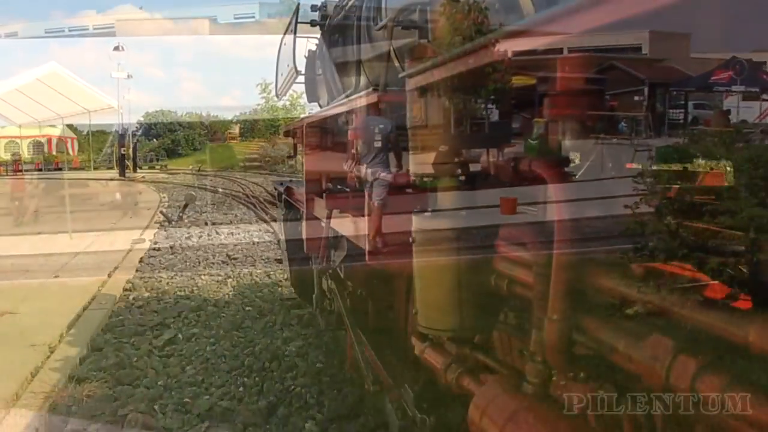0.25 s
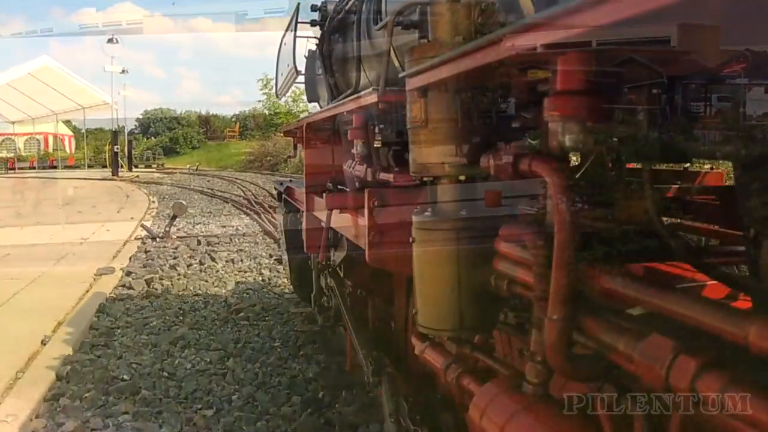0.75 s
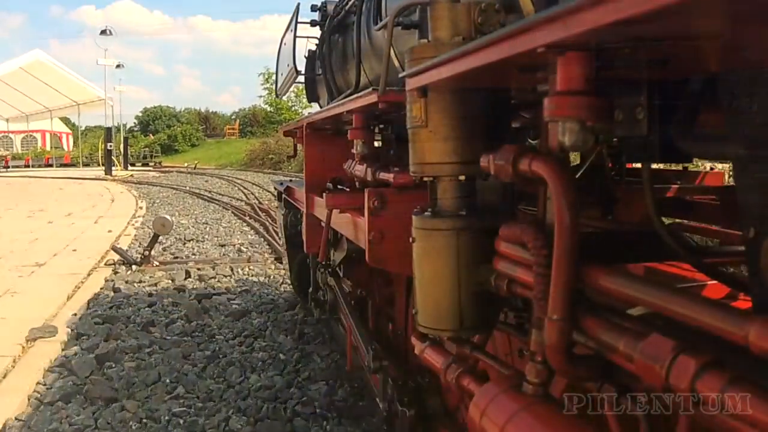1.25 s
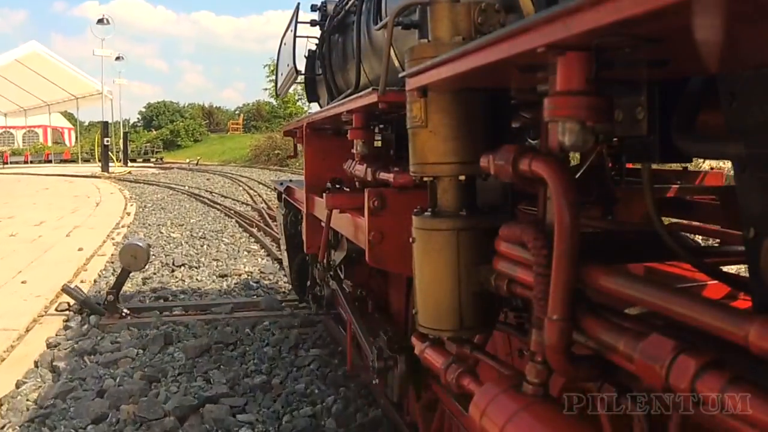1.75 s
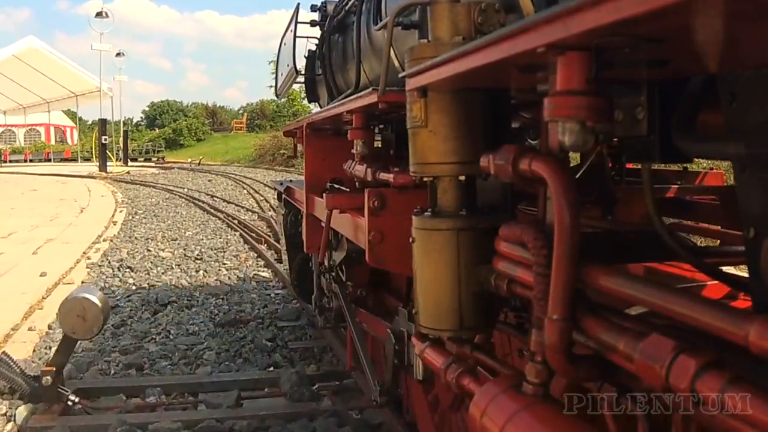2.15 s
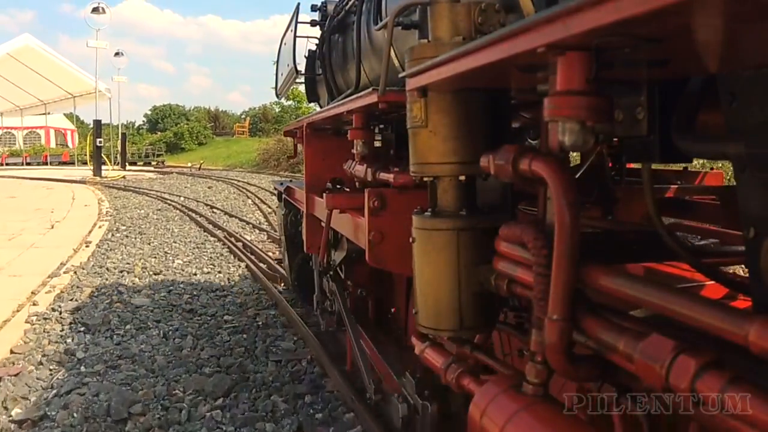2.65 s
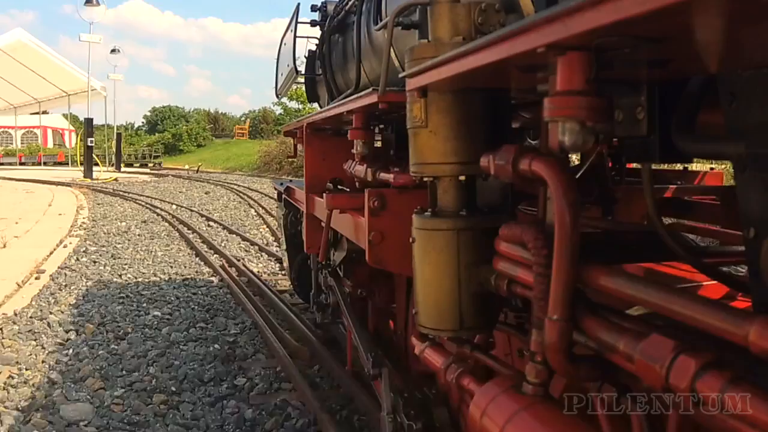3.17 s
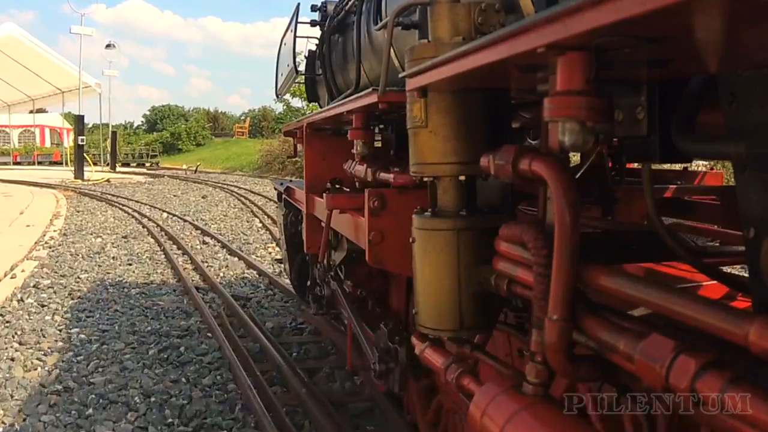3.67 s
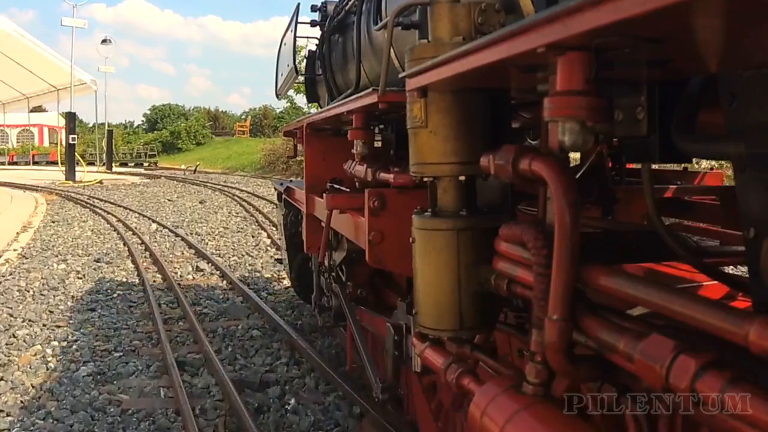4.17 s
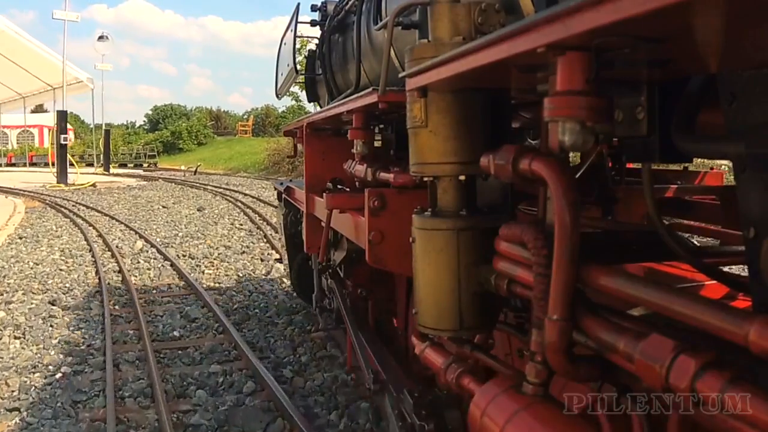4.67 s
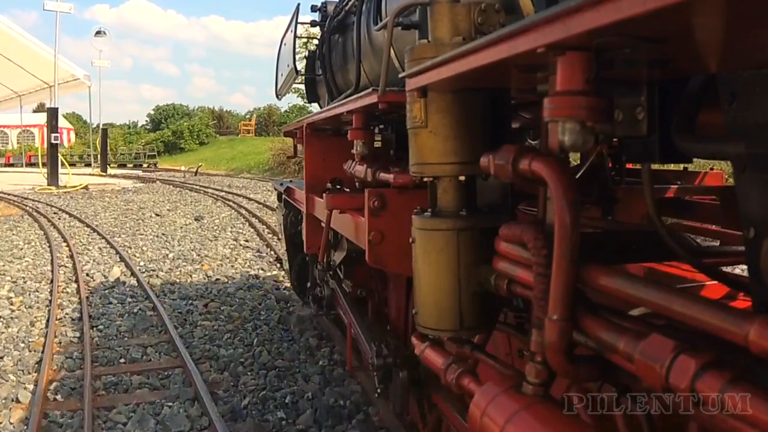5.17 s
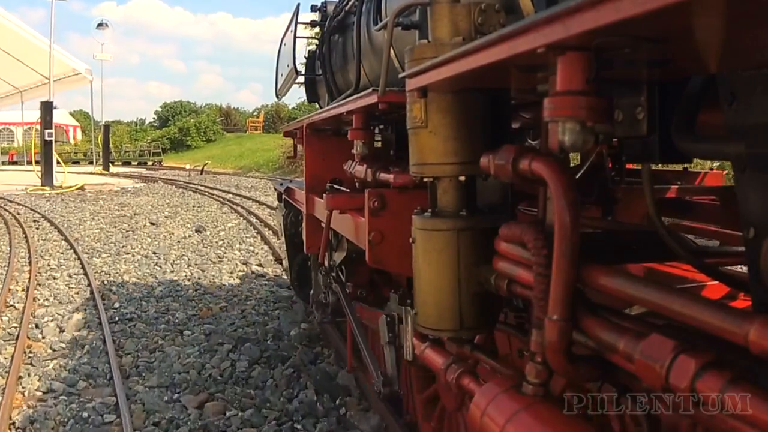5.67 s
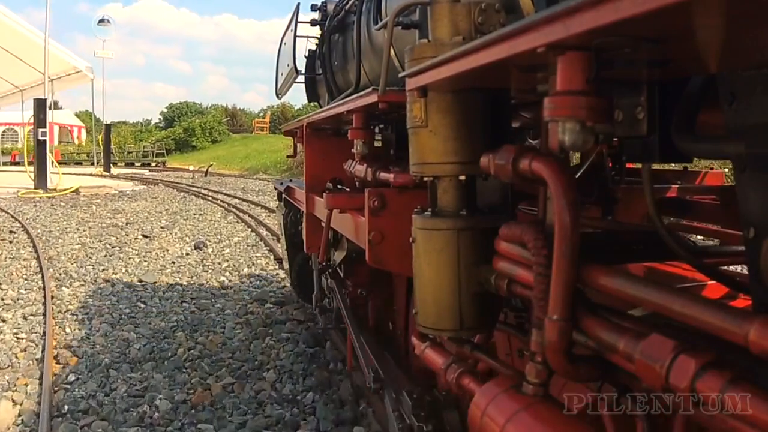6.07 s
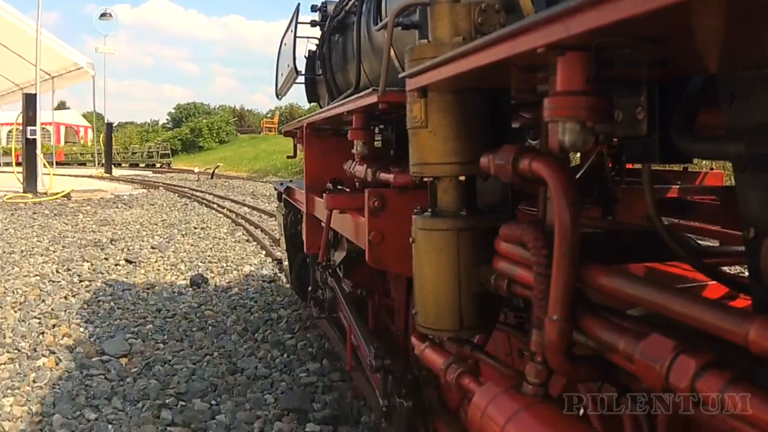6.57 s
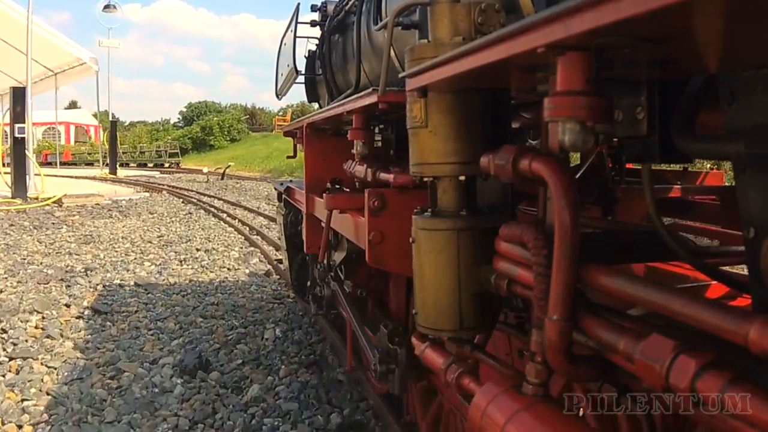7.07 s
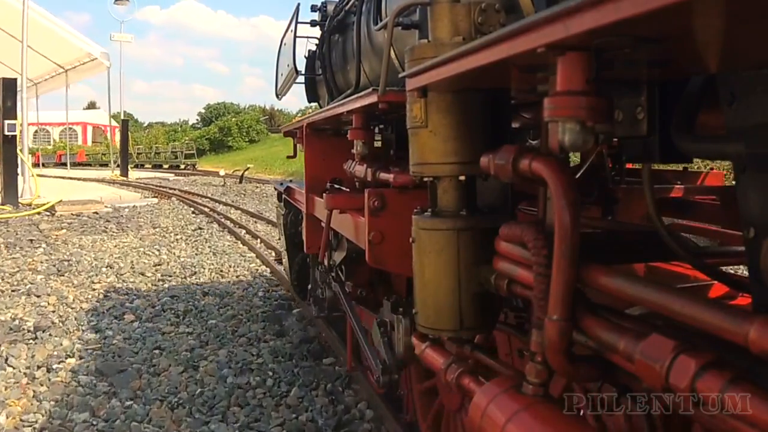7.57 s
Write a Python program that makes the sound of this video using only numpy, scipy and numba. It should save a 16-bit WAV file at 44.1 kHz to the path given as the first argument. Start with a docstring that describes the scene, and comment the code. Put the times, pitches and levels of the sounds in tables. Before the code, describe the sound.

Close, boxed-in rumble of a small steam locomotive's running gear, with irregular metallic knocks, one hard overloaded clank midway, and faint hiss.

```python
"""Riding on a small steam locomotive

A camera in a closed housing rides beside the rods and wheels: noise and blows drive banks of resonances.
Rolling, rough swells and knocks at rail joints and points ring frame and housing; shaped noise makes ticks and
steam hiss; short sines make pings, a chirp and high blips; one steady sine makes a thin whine. A broad airy
rush with low rumble, made of shaped noise, sinks over the first two seconds and stays faint."""
import sys
import numpy as np
from scipy import signal
from scipy.fft import rfft, irfft, next_fast_len
from scipy.io import wavfile
from scipy.ndimage import uniform_filter1d
from numba import njit

SR = 44100
rng = np.random.default_rng(int(sys.argv[2]) if len(sys.argv) > 2 else 0)


def generate_wav(sig):
    """Save sig (samples, or channels by samples) to the path in sys.argv[1] as 16-bit PCM at SR."""
    pcm = np.round(np.clip(np.atleast_2d(sig).T, -1, 1) * 32767).astype(np.int16)
    wavfile.write(sys.argv[1], SR, pcm)


N = 345303


def running_gear():
    """Rolling and knocks ring the body; the housing wall stops its treble, fittings rattle above it."""
    # rolling before each part's gain: (time [s], body level [dB], rods and fittings [dB], chassis hum [dB])
    rolling = [(0, -26, -47, -49), (.4, -24.5, -42.5, -50), (.8, -24.5, -42.5, -41), (1.5, -22.5, -46, -44),
               (2.2, -22.5, -44, -44), (2.95, -26, -44, -41.5), (3.4, -24, -45.5, -33),
               (3.7, -22, -46.5, -46.5), (4.2, -23.5, -48.5, -42.5), (5.0, -24.5, -47, -40),
               (5.4, -27, -47, -45), (6.1, -26, -46, -45), (6.7, -24.5, -46, -42),
               (7.15, -24, -44.5, -43.5), (7.45, -24.5, -47, -52.5), (7.83, -23, -42.5, -41)]
    # frame and housing modes: (pitch [Hz], width [Hz], relative level [dB], left minus right [dB])
    body_modes = [(82.4, 17, -2.5, 6.5), (183, 22, -7.5, 5), (223.2, 33.5, 0, 5), (327.3, 37.46, 1.47, 3),
                  (447, 35, -6, 7.5), (532, 56.4, -1, 4.5), (623.8, 45.5, 0.9, 7.5), (799, 58.4, -1, 4.5),
                  (976, 45.5, -7, 6.5), (1210.5, 62, -8, 9), (1266, 49.75, -8.5, 10.5),
                  (1474, 36.8, -10, 3.5), (1510, 40.7, -9, 0)]
    # rods and small fittings: (pitch [Hz], width [Hz], relative level [dB], left minus right [dB])
    fitting_modes = [(1700, 125, -9, 0), (1856, 101, -4.5, 13), (1963, 136, -12, -23),
                     (2270, 216, 2.5, -8.5), (2473, 440, -0.5, 10), (2657, 225, 2, 0),
                     (3020, 108, -7.5, 19), (3570, 437, -1.5, 5.5), (3900, 244, -5.5, 14.5),
                     (4184, 180, -12.5, -14.5), (4700, 120, -22, 2), (5050, 1000, -13, 8),
                     (6340, 1100, -17, 2)]
    wall_hz, low_cut_hz = 1584, 77
    right_lag_s, fittings_lag_s, tick_lag_s = 7e-5, 0.00035, 0.0003
    rod_share, rod_loss_db = 0.39, -10  # rods lie between plate and small fittings
    hum_drive_db = 19  # the low mode is narrow and takes a stronger push
    upper_plate_db = 6  # knocks ring the higher plate modes harder
    mode_drift, drift_per_s = 0.3, 8  # drift in mode widths

    roll, rattle, hum = undb(curves(rolling))
    hum = hum * undb(hum_drive_db + 0.81 * walk(4.03))
    s, shell_db, frame_db, plate_db, small_db, t60 = knocks()
    rod_db = rod_share * plate_db + (1 - rod_share) * small_db + rod_loss_db

    # each part has its own play, and each knock reaches the parts in its own proportions
    # every force is a pair: steady push, blows
    thump = jolts(s, frame_db, 2.07 * t60, rise=0.0029)
    chassis = hum, undb(-3) * thump
    frame = roll * chatter(rate=16, spread_db=-10.0, t60=0.36), thump

    shell_push = roll * chatter(rate=60, spread_db=0.5, t60=0.046) + rough_swells(column=4)
    shell = shell_push, jolts(s, shell_db, t60, rise=0.00053)

    plate_push = roll * chatter(rate=45, spread_db=16.5, t60=0.049) + rough_swells(column=2)
    plate = plate_push, jolts(s, plate_db, t60, rise=0.0032)
    upper_plate = plate[0] + rough_swells(column=2), undb(upper_plate_db) * plate[1]

    rod_push = rattle * chatter(rate=43, spread_db=15.0, t60=0.029) + rough_swells(column=3)
    rods = rod_push, jolts(s, rod_db, 1.64 * t60, rise=0.0016)
    low_rods = rods[0] + undb(22.5) * rough_swells(column=3), undb(13.0) * rods[1]

    small_push = rattle * chatter(rate=43, spread_db=10.0, t60=0.034)
    small = small_push, jolts(s, small_db, 1.58 * t60, rise=0.0016)

    def body_force(hz):
        """Chassis, frame, shell and plate drive the body modes from low to high."""
        if hz < 120:
            return chassis
        if hz < 400:
            return frame
        if hz < 1100:
            return shell
        return plate if hz < 1400 else upper_plate

    def fitting_force(hz):
        """Rods, then small fittings share the treble from low to high."""
        if hz < 2110:
            return low_rods
        return rods if hz < 2850 else small

    def drifting_ring(x, hz, width):
        """Body modes waver as the load on the frame shifts."""
        return waver(x, hz + mode_drift * width * walk(drift_per_s), width)

    def double_ring(x, hz, width):
        """Two equal resonances in a row give steeper skirts."""
        return ring(ring(x, hz, width), hz, width)

    body = modes(body_modes, body_force, flicker_db=1.24, alike_hz=14000, snap=9.4, together=0.71,
                 resonate=drifting_ring)
    body = signal.sosfilt(signal.butter(6, wall_hz, fs=SR, output="sos"), body)
    body = signal.sosfilt(signal.butter(2, low_cut_hz, "high", fs=SR, output="sos"), body)
    fittings = modes(fitting_modes, fitting_force, flicker_db=2.0, alike_hz=9000, snap=4.2, together=0.43,
                     resonate=double_ring)
    enclosed = housing(late(body, right_lag_s) + late(fittings, fittings_lag_s))
    return enclosed + ticks(s + tick_lag_s, small_db)


def knocks():
    """The clear knocks and faint ones at chance moments, by column."""
    # blows before each part's scaling:
    # (time [s], shell [dB], frame [dB], plate [dB], small fittings [dB], base t60 of the jolt [s])
    clear_knocks = [(0.051, -40, -42, -38, -48, 0.025), (0.127, -14, -22, -7, -30.5, 0.026),
                    (0.147, -17, -26, -10.5, -35, 0.022), (0.272, -42.5, -46, -8, -38, 0.012),
                    (0.411, -15, -41, -7, -29, 0.019), (0.434, -32, -44, -12.5, -27.5, 0.04),
                    (0.636, -27, -42, -30, -36, 0.053), (0.676, -33, -41, -11.5, -32, 0.042),
                    (0.77, -46, -52, -19, -35, 0.02), (0.825, -21, -49, -32, -38, 0.02387),
                    (0.87, -39, -52, -13, -36.5, 0.063), (0.991, -22, -55, -19, -49, 0.2),
                    (1.119, -18, -39, -15, -54, 0.03), (1.136, -17, -25, -18, -39.5, 0.12),
                    (1.201, -14, -43.5, -11, -42, 0.029), (1.241, -18, -40, -17, -58, 0.025),
                    (1.279, -32, -36, -17, -55, .02), (1.401, -9.5, -32, -25, -39, 0.016),
                    (1.436, -26, -27, -19, -39.5, 0.17), (1.536, -18, -35, -20, -58, 0.013),
                    (1.657, -30, -39, -12, -48, 0.016), (1.713, -16, -26, -19, -47, 0.015),
                    (1.757, -8, -30, -24, -53, 0.021), (1.766, -28, -34, -15.5, -42, 0.072),
                    (1.994, -39, -26, -21, -38, 0.01), (2.035, -32, -18.5, -8.5, -44, 0.056),
                    (2.23, -17, -45, -23, -69, 0.032), (2.31, -13, -26, -19, -54, 0.023),
                    (2.349, -19.5, -44, -16.5, -43, 0.14), (2.378, -25, -31, -16, -54, 0.11),
                    (2.49, -27, -44, -18, -52.5, 0.016), (2.687, -18.5, -22, -14, -42, 0.26),
                    (2.743, -17, -34, -28, -38, 0.027), (2.953, -24, -31, -19.5, -57, 0.17),
                    (2.974, -16.5, -25, -23, -35.5, 0.14), (3.036, -16, -46, -18, -44, 0.08),
                    (3.193, -18, -32, -14, -40.5, 0.096), (3.222, -16, -42, -4, -31, 0.037),
                    (3.244, -20, -22, -15, -40, .04), (3.279, -12.5, -25, -2, -28, 0.031),
                    (3.308, -18, -44, -10, -41, 0.02078), (3.442, -13.5, -32, -22, -39, 0.015),
                    (3.521, -5, -3.5, -19, -36, 0.026), (3.524, -1.5, -4, -1, -20, 0.041),
                    (3.533, -2, -3, 3.5, -11.5, 0.017), (3.556, -7, -35, -4, -36, 0.017),
                    (3.584, -11.5, -20, -4.5, -36, 0.029), (3.61, -37.5, -23, -9, -37, 0.019),
                    (3.645, -16, -40, -9, -55, 0.015), (3.768, -12.5, -19, -18, -60, 0.02),
                    (3.812, -10.5, -16, -5, -35, 0.029), (3.861, -15, -9, -7.5, -24, 0.029),
                    (3.892, -17, -40, -18, -46, 0.078), (3.927, -6.5, -43, -1, -42, 0.018),
                    (4.103, -16, -25, -37, -60.5, 0.021), (4.15, -24, -18, -36, -54, 0.21),
                    (4.196, -21, -23, -14, -37.5, 0.058), (4.262, -31, -8.5, -14, -40, 0.019),
                    (4.402, -23, -54, -19.5, -41, 0.11), (4.447, -27, -28, -18, -45, 0.072),
                    (4.571, -26, -22, -20, -61, 0.12), (4.666, -22, -30, -19, -51, 0.018),
                    (4.76, -26, -42, -17, -55, 0.09), (4.799, -48, -42, -24, -41, 0.03),
                    (4.905, -20, -40, -41, -63, 0.054), (4.923, -21, -32, -13.5, -57, 0.034),
                    (5.061, -13, -22, -15, -42, 0.025), (5.093, -23, -26, -19, -59, 0.055),
                    (5.25, -26, -22, -17.5, -58, 0.046), (5.284, -17, -11.5, -42, -63.5, 0.025),
                    (5.395, -24, -32, -18, -60, 0.015), (5.44, -37, -35, -14, -46, 0.024),
                    (5.457, -42, -43, -9, -40, 0.027), (5.48, -13, -26, -29, -58, 0.015),
                    (5.674, -13, -36, -10.5, -43, 0.02), (5.805, -18, -33, -11.5, -49, 0.05303),
                    (5.878, -43, -43, -7.5, -54, 0.0085), (6.155, -25, -20.5, -36, -73, 0.17),
                    (6.322, -14, -24, -25, -55.5, 0.03), (6.47, -10, -20, -21, -42, 0.022),
                    (6.501, -14.5, -37, -13, -45, 0.019), (6.71, -30, -19, -8.5, -52, 0.046),
                    (6.752, -35, -22, -22, -60, 0.069), (6.824, -19, -29, -7, -42, 0.022),
                    (7.114, -34, -44.5, -6, -40, 0.024), (7.208, -24, -19, -33, -63, 0.07),
                    (7.371, -17, -25, -25, -62, 0.021), (7.402, -18.5, -34.5, -21, -48, 0.054),
                    (7.444, -15, -18, -30, -47, 0.091), (7.496, -17, -37, -40, -44, 0.034),
                    (7.545, -15.5, -31, -32, -53, 0.023), (7.666, -18, -29, -14, -45, 0.069),
                    (7.696, -28, -28, -20, -46, 0.018), (7.74, -20, -19, -20, -52, 0.03)]
    faint_per_s, spread_db = 4, 5  # each level strays up to the spread either way
    centre_db, t60 = np.array([-26, -30, -24, -51]), 0.05  # shell, frame, plate, small fittings
    faint = []
    for moment, *luck in rng.random((int(faint_per_s * N / SR), 5)):
        levels = centre_db + 2 * spread_db * (np.array(luck) - 0.5)
        faint.append((moment * N / SR, *levels, t60))
    return np.transpose([*clear_knocks, *faint])


def jolts(times, db, t60, rise):
    """Force envelope of blows: a rounded rise, then exponential fall."""
    env, t = np.zeros(N + SR), np.arange(SR // 8) / SR
    blows = np.broadcast(times, undb(db), np.maximum(t60, 0.005), np.maximum(rise, 2e-4))
    for s, gain, fall, up in blows:
        i = int(s * SR)
        attack = np.sin(np.pi / 2 * np.minimum(t / up, 1))
        decay = np.exp(-np.log(1000) * np.maximum(t - up, 0) / fall)
        env[i:i + len(t)] += gain * attack * decay
    return env[:N]


def chatter(rate, spread_db, t60):
    """Loose play in the motion: many small random jolts over a steady push, rms 1."""
    moment, strength = rng.random((int(rate * N / SR), 2)).T
    env = 1 + jolts(moment * N / SR, -8.0 + spread_db * strength, t60, 0.0016)
    return env / np.sqrt(np.mean(env ** 2))


def rough_swells(column):
    """Force of rough swells of body, plate and rods, broken into quick slips."""
    # before each part's gain: (time [s], length [s], plate level [dB], rods level [dB], shell level [dB])
    swell_rows = [(0.61, 0.12, -35, -58, -24.5), (1.337, 0.068, -46, -65, -34), (1.487, .08, -42, -63, -30),
                  (2.593, 0.1, -24, -46, -34), (5.408, 0.057, -26, -55, -45), (6.442, 0.03, -22, -45, -34),
                  (6.716, 0.11, -19.5, -45, -37), (7.294, .1, -50, -69, -32), (7.69, 0.092, -38, -65, -30)]
    t, env = np.arange(N) / SR, 0
    for row in swell_rows:
        swell = np.sin(np.pi * np.clip((t - row[0]) / row[1], 0, 1))
        env = env + undb(row[column]) * swell
    return env * undb(3 * walk(70))


def modes(table, force, flicker_db, alike_hz, snap, together, resonate):
    """Every mode takes its share of the force, partly the same shaking for all, which darkens the gaps."""
    # push of a blow at a mode's pitch, its phase wander in mode widths, its noise share
    shake_db, wander, blow_grit = 10.5, 5.98, 0.68
    total = np.sqrt(sum(w * undb(db) ** 2 for _, w, db, _ in table) * np.pi / SR)
    out, common = 0, rng.standard_normal((2, N))
    for k, (hz, width, db, side_db) in enumerate(table):
        steady, blows = force(hz)
        a, b = together * common + np.sqrt(1 - together ** 2) * rng.standard_normal((2, N))
        alike = np.exp(-hz / alike_hz)  # high modes differ more between the microphones

        def both(v):
            """Left as given, right partly replaced by separate noise."""
            return np.array([v, alike * v + np.sqrt(1 - alike ** 2) * b])

        # a blow shakes each mode at its own pitch, firmly but with a wandering phase
        phase_step = 2 * np.pi * hz / SR + np.sqrt(wander * width / SR) * rng.standard_normal(N)
        shake = undb(shake_db) * np.sqrt(width / SR) * np.cos(np.cumsum(phase_step))
        rough = steady * undb(flicker_db * walk(9)) * both(a) + blows * both(shake + blow_grit * a)
        # soon after its onset a blow gives one sharp push, the same for both microphones
        rising = 1.0 * (np.diff(blows, prepend=0) > 0)
        contact = np.roll(np.diff(rising, prepend=0) > 0, 40)  # 40 samples on
        push = rough + snap * (-1) ** k * contact * blows
        out = out + undb(db) * pan(side_db) * resonate(push, hz, width)
    return out / total


@njit
def waver(x, hz, width):
    """Band-pass whose centre moves every sample, gain 1 at the centre."""
    y = np.empty_like(x)
    for c in range(x.shape[0]):
        band, low = 0., 0.
        for i in range(x.shape[1]):
            g, k = np.tan(np.pi * hz[i] / SR), width / hz[i]
            v = (band + g * (x[c, i] - low)) / (1 + g * (g + k))
            band = 2 * v - band
            low += 2 * g * v
            y[c, i] = k * v
    return y


def housing(x):
    """The closed housing cancels the sound in narrow bands, one after another."""
    # (centre [Hz], width [Hz], share removed at the centre)
    dips = [(1158, 39, 0.25), (1375, 75, 0.42), (1640, 37, 0.34), (1807, 160, 0.46), (2055, 210, 0.65),
            (2620, 71, .4)]
    for hz, width, share in dips:
        x = x - share * ring(x, hz, width)
    return x


def late(x, s):
    """The right port hears it s seconds later."""
    return np.array([x[0], np.roll(x[1], round(s * SR))])


def ticks(s, db):
    """Pins and valve gear tick with every knock, reaching the microphones through the air as noise bursts."""
    # two noise spectra: (frequency [Hz], relative density [dB per Hz])
    tick_colour = [(2500, -29), (4500, 5.5), (6000, 0.5), (8000, -2), (11000, -28)]
    sizzle_colour = [(6500, -30), (8500, 7), (12000, -4), (14500, -18)]
    tick_db, sizzle_db = -16, -17.5  # against the small fittings
    rise_s, t60_s = 0.0028, 0.034
    tick = jolts(s, db + tick_db, t60_s, rise_s) * colour(pair(0.3), tick_colour)
    sizzle = jolts(s, db + sizzle_db, 0.77 * t60_s, rise_s) * colour(pair(0.17), sizzle_colour)
    return pan(13.0) * (tick + sizzle)


def pings():
    """Short damped pings, some alone, some together with a knock; one chirp slides down as it fades."""
    # single pings or short even runs: (first time [s], pings, level before damping and pan [dB], pitch [Hz])
    ping_runs = [(.413, 1, -19, 1500), (0.436, 1, -22, 1530), (3.28, 1, -7, 1492), (6.503, 1, -24, 1550),
                 (6.713, 1, -19, 1520), (7.115, 1, -23, 1510), (1.203, 1, -29, 1860), (4.925, 1, -36, 1890),
                 (5.254, 1, -31, 1880), (5.806, 1, -31, 1890), (6.457, 1, -37, 1950), (6.712, 1, -28, 1900),
                 (6.737, 1, -33, 2300), (6.754, 1, -28, 1900), (4.126, 1, -40, 2440),
                 (4.151, 1, -39.5, 2210), (4.301, 1, -37.5, 2300), (4.484, 1, -34, 2240),
                 (4.57, 1, -36, 2330), (4.645, 2, -42, 2330), (4.803, 4, -36, 2420), (5.256, 1, -35, 2260),
                 (5.535, 5, -39, 2420), (6.503, 1, -40, 2450), (6.712, 1, -36, 2600), (6.826, 1, -31, 2250),
                 (7.116, 1, -29, 2300)]
    gap_s = 0.0385
    out, t = np.zeros(N + SR), np.arange(SR // 10) / SR
    for first, repeats, db, hz in ping_runs:
        tone = np.sin(2 * np.pi * hz * t) * np.minimum(t / 0.001, 1) * np.exp(-t / 0.0076)
        for k in range(round(repeats)):
            i = int((first + k * gap_s) * SR)
            out[i:i + len(t)] += undb(db) * tone
    chirp_s, chirp_db, from_hz, to_hz, glide_s = 0.824, -43, 5900, 5650, 0.025
    cycles = np.cumsum(to_hz + (from_hz - to_hz) * np.exp(-3 * t / glide_s)) / SR
    fade = np.minimum(t / 0.0022, 1) * np.exp(-3.2 * t / glide_s)
    i = int(chirp_s * SR)
    out[i:i + len(t)] += undb(chirp_db) * np.sin(2 * np.pi * cycles) * fade
    return pan(4.7) * out[:N]


def high_blips():
    """Brief thin high tones near 14 kHz, each swelling to a peak and fading, roughened by noise."""
    # (peak time [s], level before roughness and pan [dB], pitch [Hz])
    blip_peaks = [(2.001, -51, 13900), (2.376, -47, 13800), (2.655, -55, 14100), (3.105, -33, 14880),
                  (3.215, -47, 14100), (3.915, -56, 14000), (4.287, -46, 13800), (4.364, -44, 13800),
                  (4.41, -45, 13600), (4.492, -56, 14000), (4.616, -56.5, 13800), (4.683, -56, 13900),
                  (4.749, -50.5, 14000)]
    rise_s, fall_s = 0.0048, 0.00639  # exponential time constants
    half = SR // 20
    out, t = np.zeros(N + SR), np.arange(-half, half) / SR
    swell = np.exp(np.where(t < 0, t / rise_s, -t / fall_s))
    for s, db, hz in blip_peaks:
        i = int(s * SR) - half
        out[i:i + len(t)] += undb(db) * np.sin(2 * np.pi * hz * t) * swell
    roughness = 1 + 2.0 * ring(rng.standard_normal(N), 250, 400)
    return pan(12.964) * out[:N] * roughness


def steam():
    """Leaking steam: broad hiss, fluttering in level."""
    # before flutter and pan: (time [s], level [dB])
    steam_level = [(0, -66), (.8, -59), (1.5, -61), (4.9, -61.5), (5.8, -57), (7.83, -56)]
    # (frequency [Hz], relative density [dB per Hz])
    hiss_colour = [(2650, -33), (4500, -15), (5090, 8), (5920, -2.5), (6400, 2), (7570, -0.5), (8530, 3),
                   (12500, -0.5), (13400, -36)]
    flutter = undb(walk(25))
    return undb(curves(steam_level)[0]) * flutter * pan(7.9) * colour(pair(0.043), hiss_colour)


def top_band():
    """A thin fluttering noise band near 12.5-14.3 kHz comes in at about 5 s."""
    # (frequency [Hz], relative density [dB per Hz])
    top_colour = [(12000, -40), (12500, -8), (12850, -4), (13300, -10), (13700, -4), (14100, 5), (14250, 2),
                  (14330, -35), (14600, -70)]
    start_s, rise_s, top_db = 4.9, 0.28, -69
    fade_in = np.clip((np.arange(N) / SR - start_s) / rise_s, 0, 1)
    flutter = undb(2 * walk(30))
    return undb(top_db) * fade_in * flutter * pan(22.0) * colour(pair(0.66), top_colour)


def whine():
    """One thin steady sine throughout."""
    whine_hz, whine_db = 11550, -75  # level before pan
    return pan(11) * undb(whine_db) * np.sin(2 * np.pi * whine_hz * np.arange(N) / SR)


def fading_rush():
    """A broad airy rush with low rumble: sinking noise, slightly unsteady, nearly mono."""
    # (time [s], level [dB])
    fade = [(0, -23), (.4, -29), (.83, -29.5), (.92, -35), (1.25, -42), (1.7, -49.5)]
    # (frequency [Hz], relative density [dB per Hz])
    rush_colour = [(12, -37), (20, 4), (55, 7), (79, 14.5), (130, 5), (208, 10), (331, -7), (380, 6.5),
                   (637, -0.5), (692, 2), (793, -10), (1410, -8), (1530, -6), (1900, -10), (2700, -16.5),
                   (13200, -36), (13900, -70)]
    level = undb(curves(fade)[0] + 0.29 * walk(4.6))
    return level * pan(0.24) * colour(pair(0.99), rush_colour)


def undb(db):
    """Decibels to amplitude."""
    return 10 ** (np.asarray(db) / 20)


def curves(table):
    """Columns of a (time, ..) table, one value a sample."""
    s, *columns = np.transpose(table)
    return [np.interp(np.arange(N) / SR, s, c) for c in columns]


def ring(x, hz, width):
    """Two-pole resonance, gain 1 at the centre."""
    return signal.lfilter(*signal.iirpeak(hz, hz / width, SR), x)


def walk(rate):
    """Random levels held 1 / rate s and smoothed twice; spread near 1."""
    k = int(SR / rate)
    steps = np.repeat(rng.standard_normal(N // k + 1), k)
    return 1.47 * uniform_filter1d(uniform_filter1d(steps, k), k)[:N]


def pair(alike):
    """Left and right noise with the given likeness, 0 to 1."""
    a, b = rng.standard_normal((2, N))
    return np.array([a, alike * a + np.sqrt(1 - alike ** 2) * b])


def colour(x, points):
    """Noise shaped by (Hz, dB) points, straight lines over log frequency, rms 1."""
    hz, db = np.transpose(points)
    n = next_fast_len(N)
    f = np.maximum(np.arange(n // 2 + 1) * SR / n, 1)
    gain = undb(np.interp(np.log(f), np.log(hz), db))
    y = irfft(rfft(x, n) * gain, n)[..., :N]
    return y / np.sqrt(np.mean(y ** 2))


def pan(db):
    """Left and right gains whose difference is db, left louder if positive."""
    return undb(np.array([[db], [-db]]) / 2)


def scene():
    """All sources together."""
    return running_gear() + pings() + high_blips() + steam() + top_band() + whine() + fading_rush()


def record(dry):
    """The hardest knock overloads the input, which saturates; the top is cut."""
    clip_level, top_hz = 0.56, 14750
    squashed = np.tanh((np.abs(dry) / clip_level) ** 3.55) ** (1 / 3.454)
    loud = clip_level * squashed * np.sign(dry)
    return signal.sosfilt(signal.ellip(12, 0.2, 90, top_hz, fs=SR, output="sos"), loud)


dry = scene()
out = record(dry)
generate_wav(out)
```